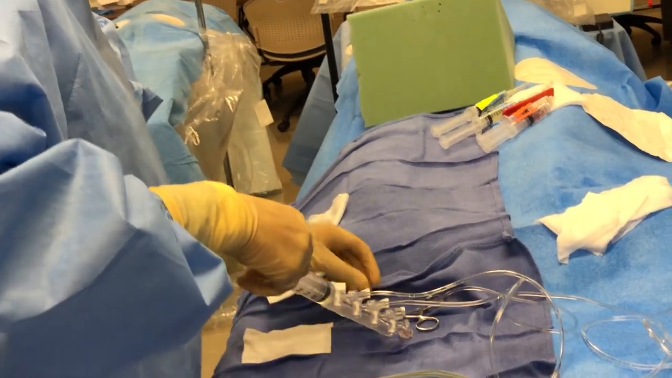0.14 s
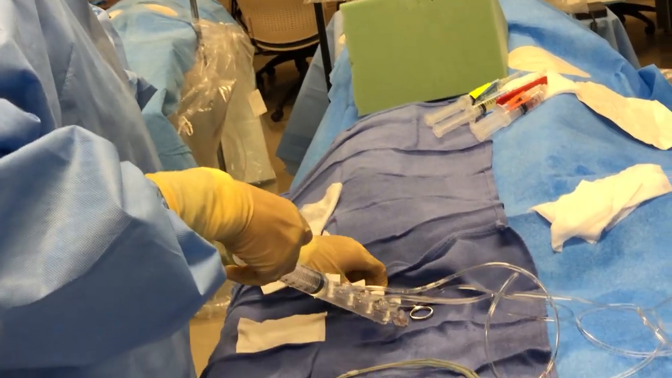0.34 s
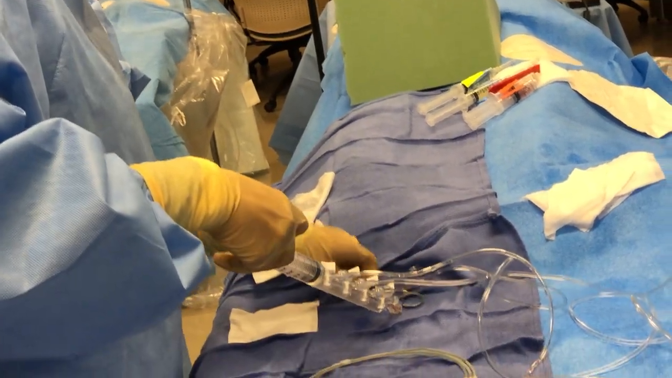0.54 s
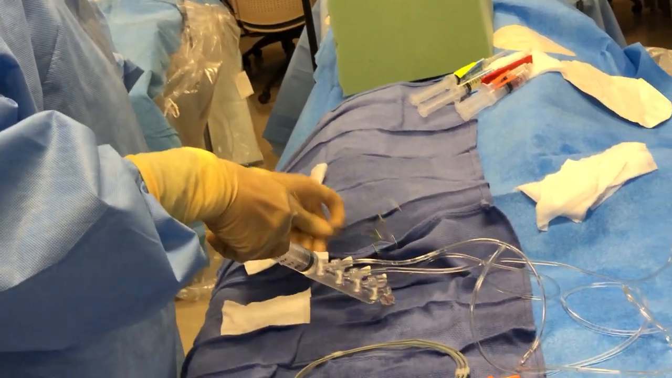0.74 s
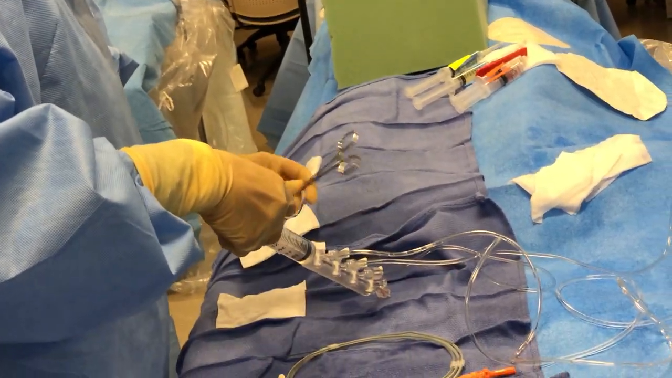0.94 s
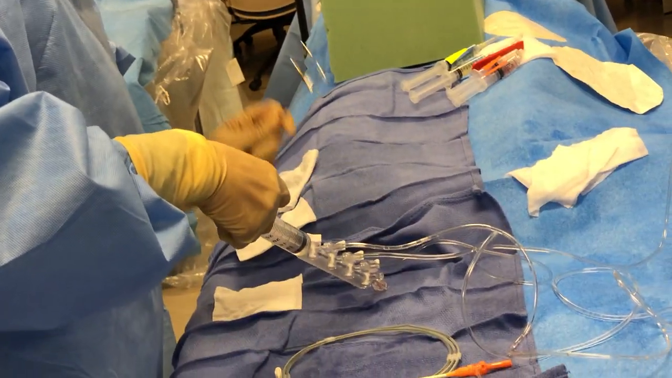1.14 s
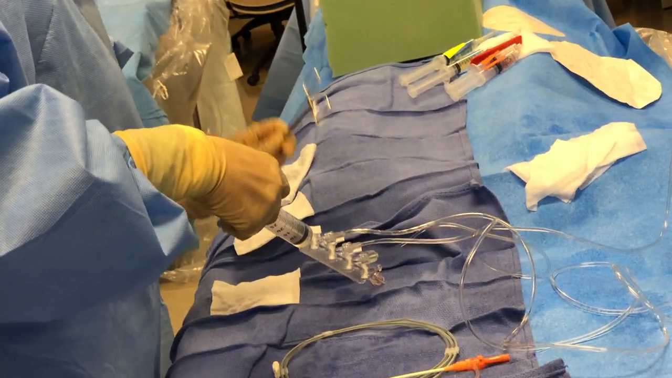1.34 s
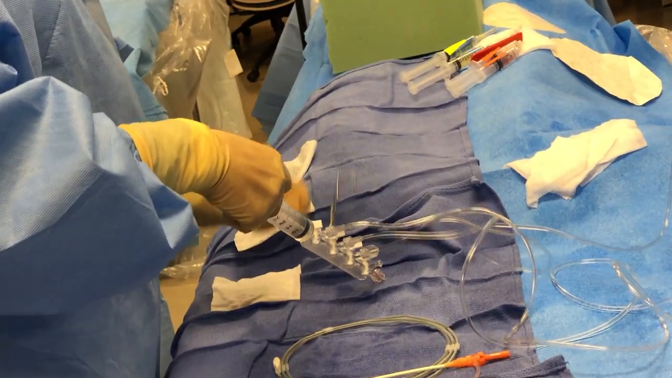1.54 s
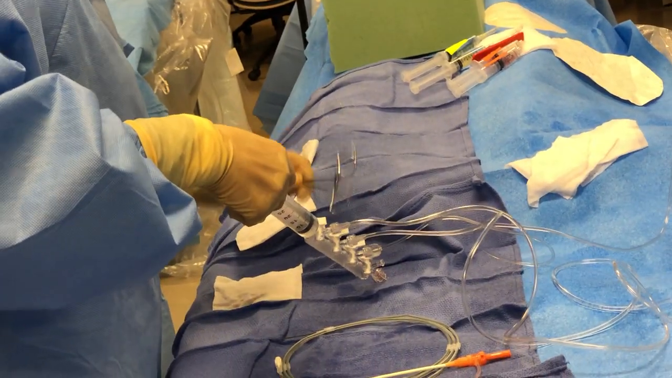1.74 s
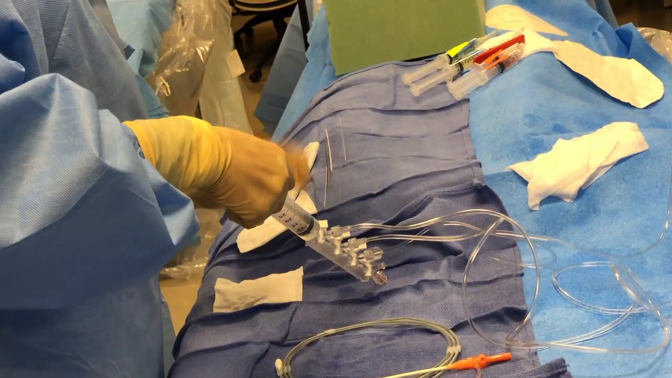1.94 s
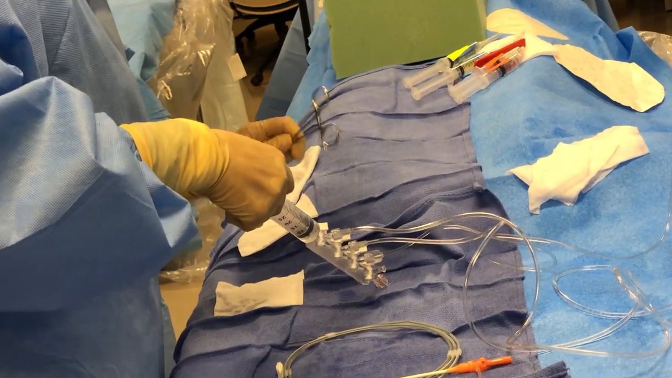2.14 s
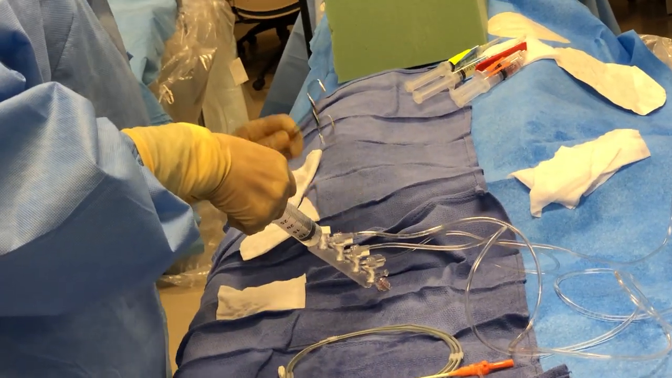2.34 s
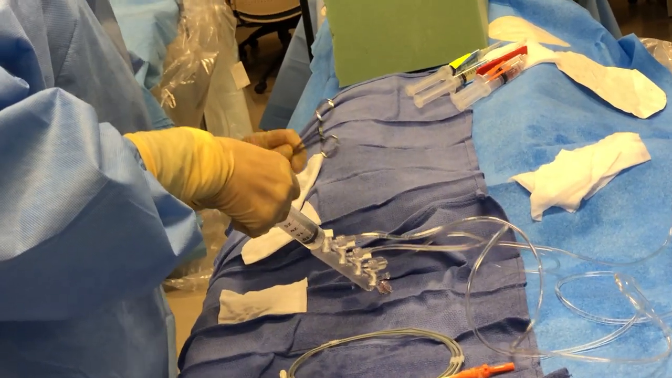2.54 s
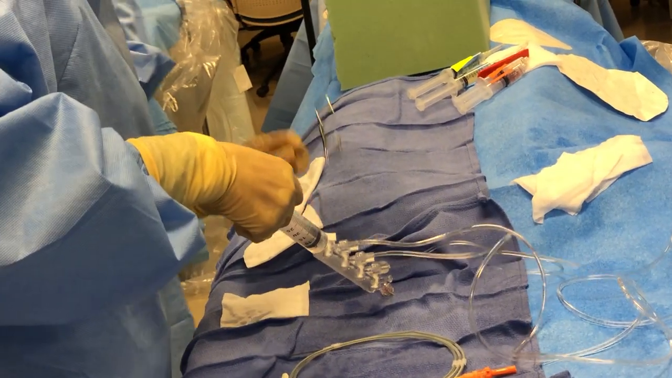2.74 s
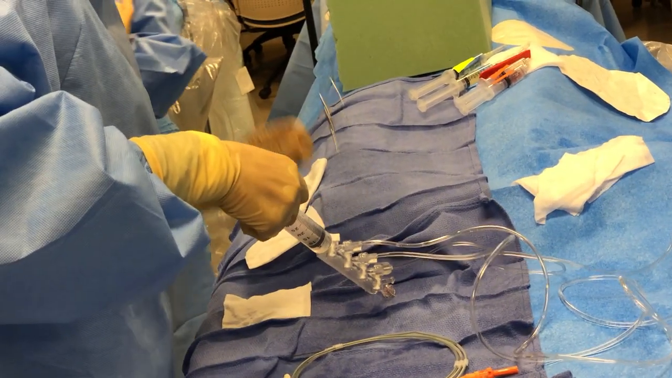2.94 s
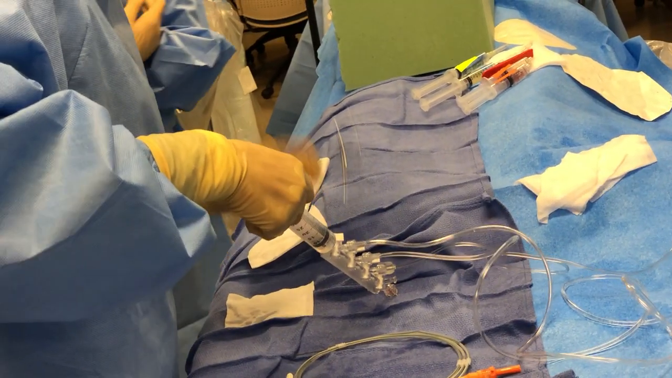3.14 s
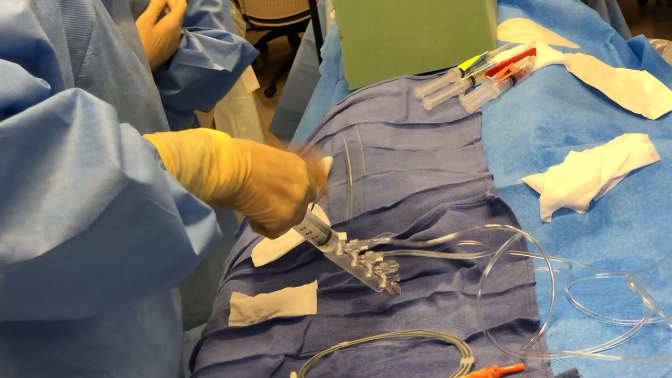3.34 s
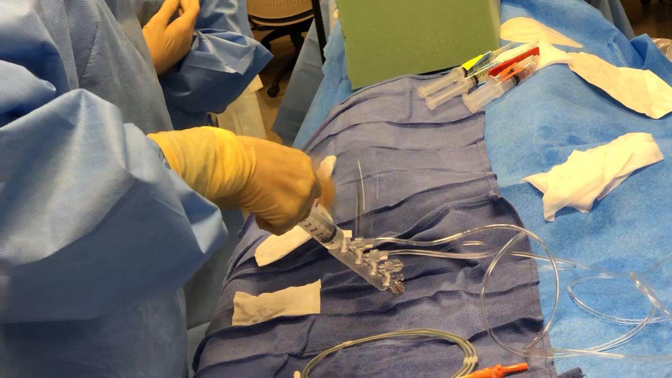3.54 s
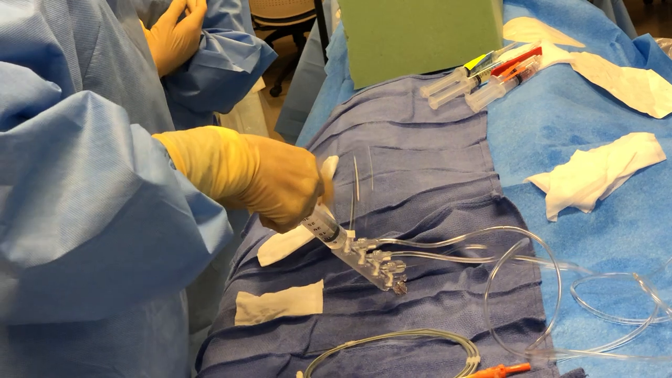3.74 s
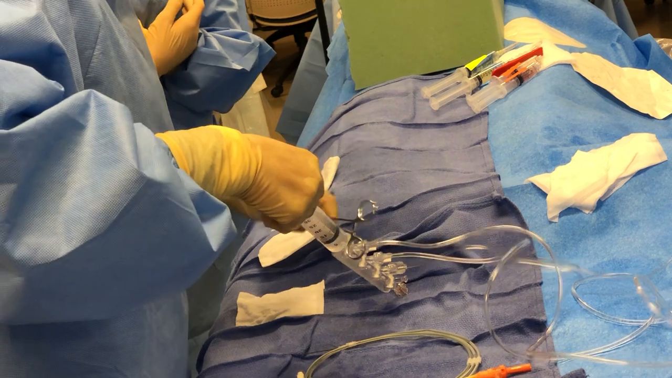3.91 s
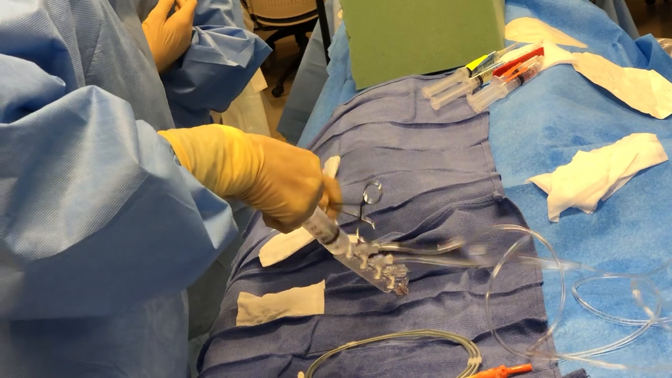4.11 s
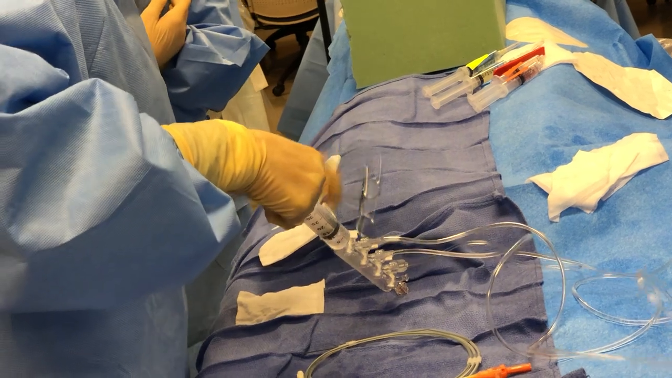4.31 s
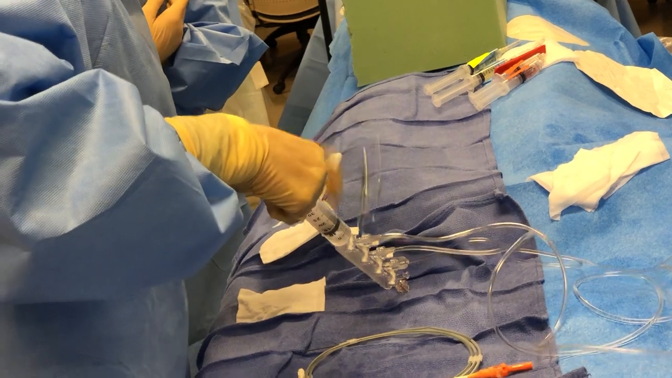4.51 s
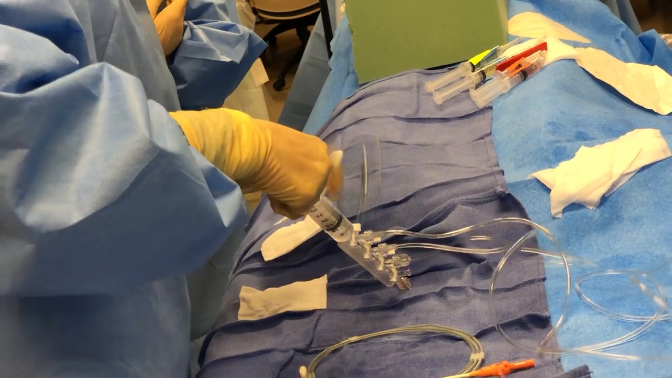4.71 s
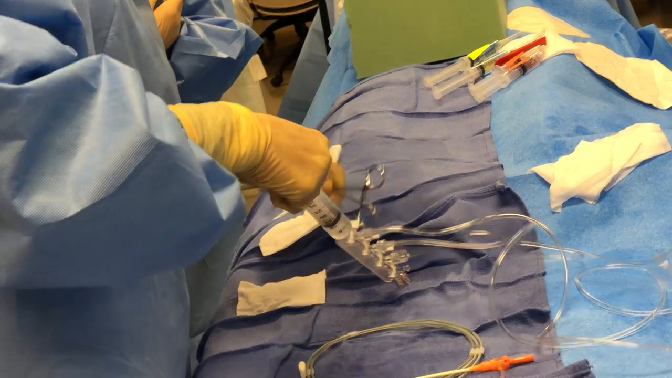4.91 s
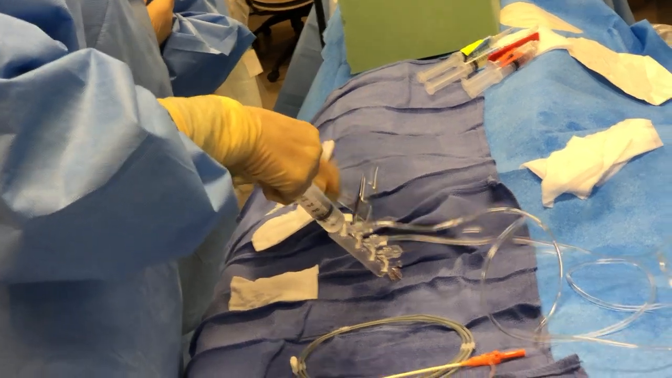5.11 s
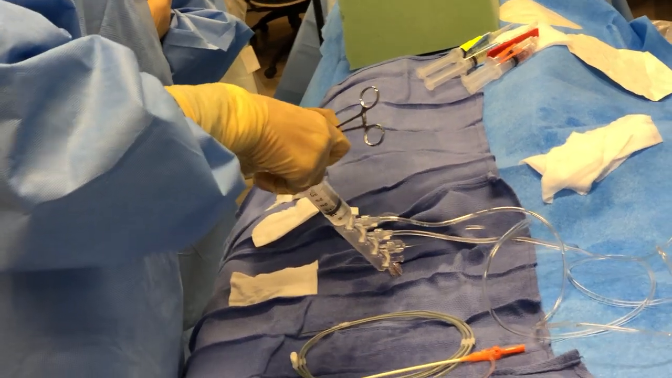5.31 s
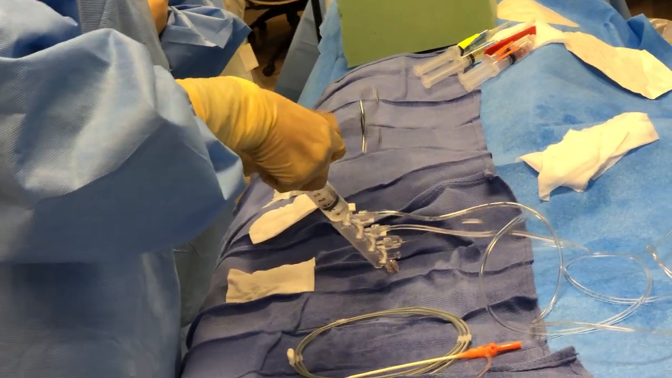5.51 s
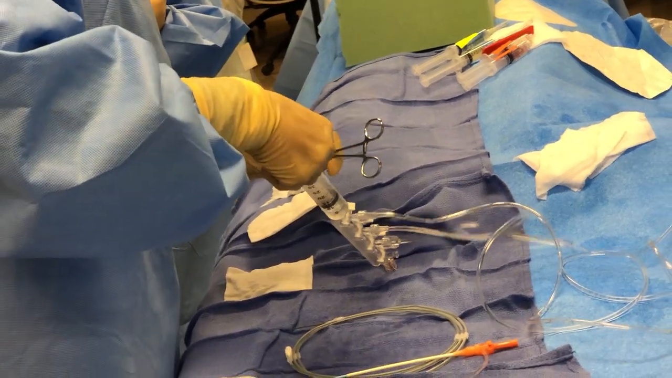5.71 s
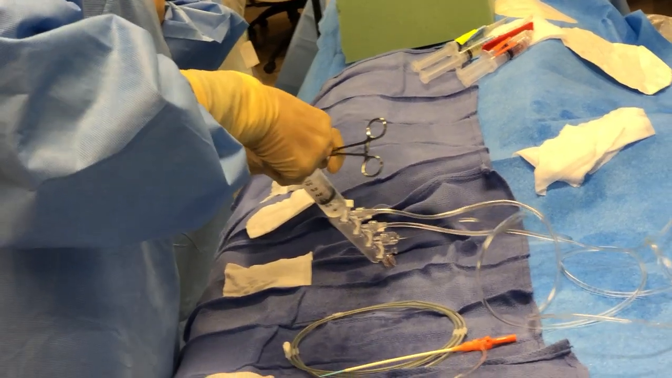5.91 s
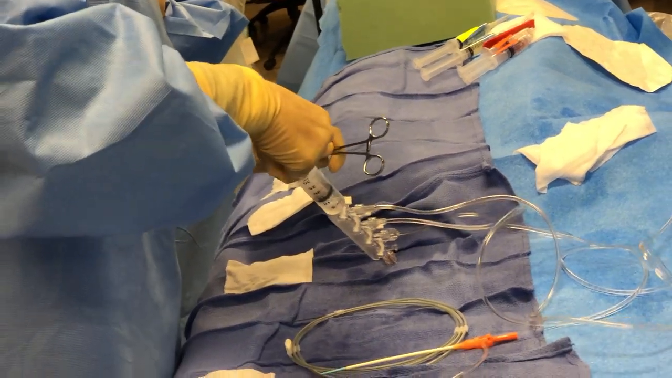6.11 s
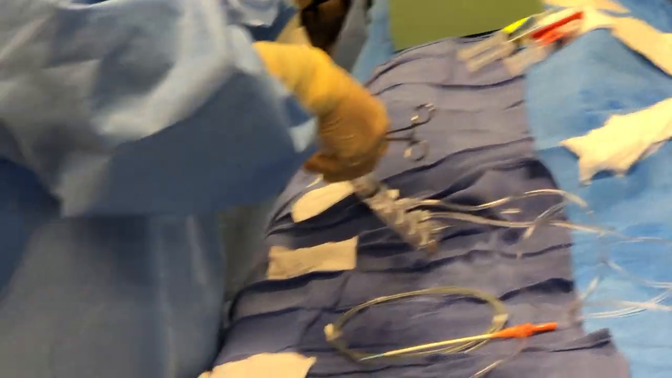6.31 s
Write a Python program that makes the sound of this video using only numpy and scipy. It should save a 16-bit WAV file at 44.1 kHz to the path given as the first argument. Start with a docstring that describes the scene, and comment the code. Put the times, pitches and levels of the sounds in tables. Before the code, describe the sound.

After a rustle of gown cloth, quick, even metal-on-plastic clicks with small bounces and rattles sound over low ventilation rumble.

```python
"""Steel forceps tap a hand-held plastic syringe and valve manifold about five times a second, in a quiet room.
Each contact is a burst of noise through short-lived plastic modes; harder ones crack shorter with less knock.
The loose forceps bounce, chatter and ring as decaying sines and sprays of tiny impulses.
A gown rustles now and then as shaped noise, over the low noise and wavering tones of the ventilation."""
import sys
import numpy as np
from scipy import signal
from scipy.fft import rfft, irfft
from scipy.io import wavfile
from scipy.ndimage import uniform_filter1d

SR = 44100
rng = np.random.default_rng(int(sys.argv[2]) if len(sys.argv) > 2 else 0)


def generate_wav(sig):
    """Save sig (samples, or channels by samples) to the path in sys.argv[1] as 16-bit PCM at SR."""
    pcm = np.round(np.clip(np.atleast_2d(sig).T, -1, 1) * 32767).astype(np.int16)
    wavfile.write(sys.argv[1], SR, pcm)


N = 285030
TIME = np.arange(N) / SR
T = TIME[:SR // 2]  # time axis of one decaying response [s]
TOP_HZ = 16000
# registers of a blow, from the whole body's knock up to the snap at the tip: (low [Hz], high [Hz])
KNOCK_HZ, CLACK_HZ, CLICK_HZ, SNAP_HZ = (200, 1500), (1500, 3600), (3600, 8000), (8000, 17000)


def undb(db):
    """Level to amplitude: 20 dB is a factor of ten."""
    return 10 ** (np.asarray(db) / 20)


def fade(t60):
    """Exponential damping: the amplitude loses 60 dB in t60 seconds."""
    return np.exp(-np.log(1000) * T / t60)


def unit(x):
    """Normalization to unit energy, the sum of squares."""
    return x / np.sqrt(np.sum(x ** 2))


def band(x, edges):
    """Causal band-pass filtering between two edges in Hz."""
    return signal.sosfilt(signal.butter(3, edges, "bandpass", fs=SR, output="sos"), x)


def noise(points):
    """Spectral shaping: white noise weighted by (frequency [Hz], level [dB]) points, scaled to rms 1."""
    hz, db = np.transpose(points)
    f = np.maximum(np.fft.rfftfreq(N, 1 / SR), 1)
    gain = undb(np.interp(np.log(f), np.log(hz), db))
    x = irfft(rfft(rng.standard_normal(N)) * gain, N)
    return x / x.std()


def walk(rate):
    """Low-pass random drift: steps at `rate` Hz smoothed twice, with a spread near 1."""
    k = int(SR / rate)
    steps = np.repeat(rng.standard_normal(N // k + 1), k)
    return 1.3 * uniform_filter1d(uniform_filter1d(steps, k), k)[:N]


def add(track, s, x):
    """Superposition: mix x into the track from second s."""
    i = int(s * SR)
    track[i:i + len(x)] += x[:N - i]


def along(table, at):
    """Linear interpolation of a table's other columns at a value of its first."""
    first, *columns = np.transpose(table)
    return [np.interp(at, first, column) for column in columns]


def ventilation(waver_db=2, drift_rad=0.59):
    """Broadband duct noise plus fan and motor tones whose amplitude and phase drift slowly."""
    # steady duct rumble: (frequency [Hz], relative level per Hz [dB])
    duct_spectrum = [(15, -79), (25, -37), (53, -8), (97, -7), (134, -2), (212, -8.5), (363, -13.5),
                     (405, -16), (531, -19.5), (575, -21.5), (624, -21.5), (695, -23.5), (863, -25),
                     (1190, -32), (16000, -51.5)]
    # fan and motor tones: (frequency [Hz], rms level before waver [dB])
    fan_tones = [(73, -69), (134, -76), (623, -77.5)]
    tones = np.zeros(N)
    for hz, db in fan_tones:
        level = undb(db + waver_db * walk(4.1))
        phase = 2 * np.pi * hz * TIME + drift_rad * walk(6)
        tones += level * np.sqrt(2) * np.sin(phase)
    return noise(duct_spectrum) * undb(-55.36) + tones


def gown(grain_db=1.0):
    """Friction noise: fabric slides in small uneven catches, a steady whisper and brushes that swell and fade."""
    # cloth friction: (frequency [Hz], relative level per Hz [dB])
    cloth_spectrum = [(300, 1.5), (900, 3.5), (2200, -5.5), (4500, -10), (8000, -15.5), (15000, -21)]
    # brushes of the sleeve: (time of the height [s], time from there to -17 dB [s], level at the height [dB],
    # brightness [dB per octave])
    brushes = [(0.252, 0.076, -69, 0), (0.438, .035, -59.5, .5), (0.6, 0.16, -66, -0.5),
               (2.42, 0.24, -60.5, 2), (4.687, 0.22, -64.5, 1.5), (5.082, 0.19, -58, 1.5),
               (5.45, 0.22, -58.5, -0.5), (5.648, 0.085, -60.5, -1.5), (5.745, 0.065, -71, 8),
               (6.44, 0.12, -68, -0.5)]
    # the sleeve keeps whispering once the arm is at work
    work_from_s, work_rise_s, work_db = 1.58, 0.37, -68.5
    out = noise(cloth_spectrum) * undb(work_db) * np.clip((TIME - work_from_s) / work_rise_s, 0, 1)
    for s, length, db, tilt_db in brushes:
        brush = noise([(hz, level + tilt_db * np.log2(hz)) for hz, level in cloth_spectrum])
        swell = np.exp(-2 * ((TIME - s) / length) ** 2)
        out += undb(db) * brush * swell
    return out * undb(grain_db * walk(90))


def blows(second_knock_db=1.5, steel_db=-36):
    """Repeated impact: yields both contacts of each stroke, and the light ticks.

    Yields (time [s], strength [dB], extra knock [dB], extra snap [dB], struck spot [Hz], steel ring [dB]). A
    second contact shakes the body more; steel_db sets the ring of a second contact or tick against its
    strength."""
    # strokes of the forceps, each two contacts: mostly a blow and its bounce, sometimes a light graze and then
    # the full blow: # (time [s], strength [dB], extra knock [dB], extra snap [dB], struck spot [Hz], steel ring
    # [dB], # delay of the second contact [s], second contact against the first [dB], spot hit by the second
    # contact [Hz])
    strokes = [(1.5014, -29, -2, -2.5, 7080, -64, 0.018, -12.5, 3900),
               (1.9077, -32.5, 1, -3.5, 4350, -59, .0107, -15.5, 4340),
               (2.225, -39, -3, -8, 4930, -66, 0.0024, -7, 7660),
               (2.422, -27, 0.5, 3, 6920, -60, 0.025, -3.5, 8500),
               (2.6438, -26.5, 1, 0.5, 6770, -55, 0.019, -14.5, 3800),
               (2.8427, -32.5, 3.5, 4.5, 2550, -62, 0.014, -1.5, 10500),
               (2.8704, -30, 7.5, 5.5, 10100, -61, 0.0073, -19, 13000),
               (3.0773, -38, 2, 0.5, 2910, -65, .0024, 10, 4500),
               (3.282, -28.5, 3, 2.5, 6230, -56, 0.0088, 0.5, 4800),
               (3.489, -32, 1.5, 3, 5900, -69, 0.018, -4.5, 11300),
               (3.6962, -28, 0.5, 0, 5790, -47, .0174, -16, 8050),
               (3.9, -42.5, 0, 3, 1560, -70, .0024, 13, 6560),
               (3.916, -37.5, 1, -5, 2820, -75, .015, -10, 4500),
               (4.122, -34, -4, -1, 4600, -52, .003, -9.5, 4500),
               (4.3217, -41, -3.5, -3.5, 8800, -35, 0.018, 4, 3720),
               (4.542, -29, -2, 0, 6670, -69, .024, -4.5, 6850),
               (4.744, -37.5, 2, -5, 4930, -66, .0047, -3.5, 5000),
               (4.9268, -33.5, 2, -2, 7030, -86.5, 0.026, -9.5, 5800),
               (5.1214, -32, -5.5, 1.5, 7000, -67, 0.0065, -9.5, 7200),
               (5.1411, -32.5, -1.5, -1, 6600, -63, .0045, -13, 7900)]
    # loose forceps drop back against the fingers or graze a fitting:
    # (time [s], strength [dB], extra knock [dB], struck spot [Hz])
    light_ticks = [(.5808, -55, 7.5, 4900), (1.5593, -50, 2, 3640), (2.3889, -66.5, 21, 3200),
                   (2.4846, -42, -2, 3600), (2.6957, -46, -1, 4170), (2.9134, -43, -4, 7400),
                   (3.1349, -44.5, 0, 7350), (3.5556, -49.5, 4, 2700), (3.65, -44, 1, 5530),
                   (4.2362, -48, 0, 3360), (4.9771, -49.5, -9, 3650), (5.858, -69, 0, 4630),
                   (6.166, -67.5, 1, 5860)]
    for s, db, knock_db, snap_db, spot_hz, ring_db, after_s, second_rel_db, second_hz in strokes:
        yield s, db, knock_db, snap_db, spot_hz, ring_db
        second_db = db + second_rel_db
        yield s + after_s, second_db, knock_db + second_knock_db, snap_db, second_hz, second_db + steel_db
    for s, db, knock_db, spot_hz in light_ticks:
        yield s, db, knock_db, 0, spot_hz, db + steel_db


def hardness(db):
    """Contact stiffness: strength sets the knock, clack and snap levels and the length of the crack."""
    # contact character: (strength [dB], knock [dB], clack [dB], snap [dB], crack t60 [s]),
    # knock, clack and snap being against the click
    stiffness = [(-40.5, -10, -4.5, -11.5, 0.029), (-39, -10, -4.5, -0.5, 0.03),
                 (-33.5, -12.5, -6, -3.5, 0.012), (-27, -18, -10.5, -4.5, 0.012)]
    knock, clack, snap, t60 = along(stiffness, db)
    return db + knock, db + clack, db + snap, t60


def ring(modes, scatter_db, detune):
    """Modal synthesis: decaying sines; the place of the blow and the grip change their strength and pitch."""
    hz, db, t60 = np.transpose(modes)[:, :, None]
    strength, pitch, side = rng.standard_normal((3, len(modes), 1))
    amplitude = np.sign(side) * undb(db + scatter_db * strength)
    waves = np.sin(2 * np.pi * hz * (1 + detune * pitch) * T)
    return np.sum(amplitude * fade(t60) * waves, axis=0)


def crack(t60, rise_s):
    """Friction burst: steel skids on plastic for a few milliseconds, as noise with a fast rise and decay."""
    return unit(rng.standard_normal(len(T)) * fade(t60) * (1 - np.exp(-T / rise_s)))


def contact(click_db, knock_db, clack_db, snap_db, spot_hz, t60,
            plastic_db=-2, spot_db=-6, spot_t60=0.0067, knock_lag_s=0.001073):
    """Impact excitation: crack, plastic modes and struck spot; the whole body knocks a moment later."""
    # manifold and syringe: (frequency [Hz], relative level [dB], t60 [s])
    plastic_modes = [(291, -0.5, 0.031), (630, -10.5, 0.02), (935, 5, 0.03), (1342, 3, 0.017),
                     (1624, 4.5, 0.022), (2752, 10.5, 0.013), (3770, -1, 0.027), (4360, 3.5, 0.014),
                     (4894, 10, 0.0067), (5956, -0.5, 0.024), (6956, 6, 0.013), (8900, -2, 0.0053),
                     (9650, -4, 0.022), (11200, 12.5, 0.0059), (12940, 17.5, 0.0016)]
    spot = unit(fade(spot_t60) * np.sin(2 * np.pi * spot_hz * T))
    plastic = unit(ring(plastic_modes, scatter_db=2, detune=.01))
    blow = crack(t60, rise_s=0.00024) + undb(plastic_db) * plastic + undb(spot_db) * spot
    # each register gets its own level
    knock = np.interp(T - knock_lag_s, T, unit(band(blow, KNOCK_HZ)), left=0)
    out = undb(knock_db) * knock
    for db, edges in ((click_db, CLICK_HZ), (clack_db, CLACK_HZ), (snap_db, SNAP_HZ)):
        out += undb(db) * unit(band(blow, edges))
    return out


def scattered(blow, blur_hz=600, size=2048):
    """Directional averaging: radiated in all directions together, a blow's fine peaks and notches even out."""
    power = np.abs(rfft(blow[:size], size)) ** 2
    power = uniform_filter1d(power, max(int(blur_hz * size / SR), 1))
    # zero-phase pulse, shifted so that both its sides are kept
    pulse = np.roll(irfft(np.sqrt(np.abs(power)), size), size // 32)[:size // 16]
    return band(pulse, (KNOCK_HZ[0], SNAP_HZ[1]))


def chatter(count=70, earliest_s=.003, spread_s=.008, db=-13, scatter_db=3):
    """Random impulse train: a thinning spray of tiny blows as the loose hinge and valve handles rattle."""
    when = np.minimum(earliest_s + spread_s * rng.exponential(size=count), T[-1])
    impulses = np.zeros(len(T))
    strength = undb(scatter_db * rng.standard_normal(count))
    impulses[(when * SR).astype(int)] = rng.choice([-1, 1], count) * strength
    return undb(db) * unit(impulses)


def barrel(s):
    """Damped resonance: hollow note of the syringe barrel, as the grip allows at second s."""
    # the hand damps the barrel until the grip loosens: (time [s], barrel ring over the knock [dB])
    grip_damping = [(4.3, -23), (4.55, 0.5), (4.75, 5), (5.15, -2)]
    db, = along(grip_damping, s)
    return undb(db) * unit(fade(0.077) * np.sin(2 * np.pi * 1135 * T))


def thud():
    """Damped low-band noise: dull push of the manifold against the gloved hand."""
    return unit(band(rng.standard_normal(len(T)) * fade(0.046), (165, 393)))


def fitting(hz, width=0.073, t60=0.051):
    """Dense modal cluster: the struck fitting sings on briefly, as decaying narrow-band noise."""
    edges = (hz / (1 + width), hz * (1 + width))
    return unit(band(rng.standard_normal(len(T)), edges) * fade(t60))


def tapping(fitting_db=-17, thud_db=-16.5, clack_share=.4, contact_s=.006):
    """Superposed impacts and their resonances: as sent to the microphone, and into the room."""
    # forceps shanks and finger loops, in close pairs and damped by the fingers:
    # (frequency [Hz], relative level [dB], t60 [s])
    steel_modes = [(4820, -18, .2), (5700, -11, .05), (5860, -10, .04), (7930, -20, .22), (8600, -1, .035),
                   (8700, -12, .13), (8840, 0, .04), (12230, -1, .035), (12400, -6, .035),
                   (15300, -3, .018)]
    direct, spread, after = np.zeros((3, N))
    for s, db, more_knock_db, more_snap_db, spot_hz, steel_db in blows():
        knock_db, clack_db, snap_db, t60 = hardness(db)
        knock_db += more_knock_db
        clack_db += clack_share * more_knock_db  # part of the extra knock also lifts the clack
        blow = contact(db, knock_db, clack_db, snap_db + more_snap_db, spot_hz, t60)
        pulse = scattered(blow)
        add(direct, s, blow)
        add(spread, s, pulse)
        add(after, s, np.convolve(pulse, chatter()))
        # a squarely landed blow, with more knock, thuds more strongly still
        push = undb(more_knock_db + thud_db) * thud()
        add(after, s, undb(knock_db) * (barrel(s) + push))
        add(after, s, undb(db + fitting_db) * fitting(spot_hz))
        add(after, s, undb(steel_db) * unit(ring(steel_modes, scatter_db=1.5, detune=.002)))
    # unit energy becomes unit rms over one contact
    return np.sqrt(contact_s * SR) * np.array([direct + after, spread + after])


def room_response(first_s=0.0035, early_t60=0.036, build_s=0.0066):
    """Reverberation: quick reflections from table and people, then a soft tail that dies at its own rate by band."""
    # the room's answer: (band centre [Hz], early reflections [dB], reverberation [dB], t60 [s])
    room_bands = [(244, -12.5, 2, 0.24), (990, -7.5, -6.5, 0.27), (2150, -16, -14, 0.39),
                  (4000, -16, -15.5, 0.43), (7920, -17, -18, 0.42), (14100, -24, -21.5, 0.48)]
    centres = np.array(room_bands)[:, 0]
    edges = np.r_[centres[0] / 2, np.sqrt(centres[1:] * centres[:-1]), TOP_HZ]
    response = np.zeros(len(T))
    for (_, early_db, late_db, t60), lo, hi in zip(room_bands, edges, edges[1:]):
        early, late = band(rng.standard_normal((2, len(T))), (lo, hi)) * (T > first_s)
        early = undb(early_db) * unit(early * fade(early_t60))
        late = undb(late_db) * unit(late * fade(t60) * (1 - np.exp(-T / build_s)))
        # weighting by bandwidth makes the levels mean gains within the band
        response += np.sqrt(2 * (hi - lo) / SR) * (early + late)
    return response


def room(x, count=16):
    """Time-varying convolution: hands and arms move, so each stretch meets its own pattern of reflections."""
    wet = np.zeros(N)
    for stretch in np.array_split(np.arange(N), count):
        add(wet, TIME[stretch[0]], signal.fftconvolve(x[stretch], room_response()))
    return wet


def first_echo(x, delay_s=.0075, db=-21.5):
    """Specular reflection: one clear delayed copy from the nearest hard surface."""
    return undb(db) * np.roll(x, int(delay_s * SR))


def scene():
    """Superposition of taps, their first echo and their room over gown and ventilation."""
    near, into_room = tapping()
    taps = near + first_echo(into_room) + room(into_room)
    return (taps + gown() + ventilation())[None]


def record(dry):
    """Band limitation: the recorder cuts the top with a steep low-pass."""
    return signal.sosfilt(signal.ellip(8, .2, 70, TOP_HZ, fs=SR, output="sos"), dry)


dry = scene()
out = record(dry)
generate_wav(out)
```